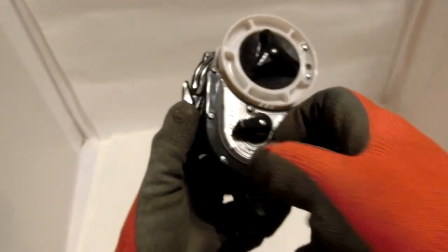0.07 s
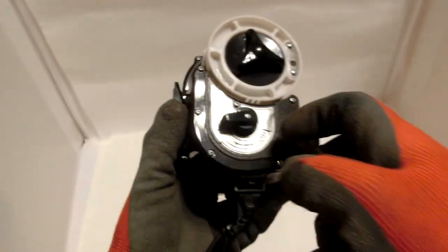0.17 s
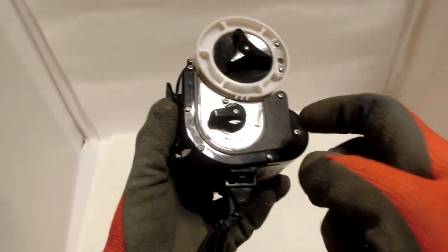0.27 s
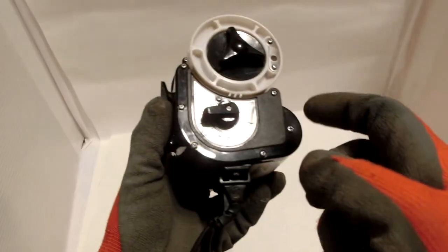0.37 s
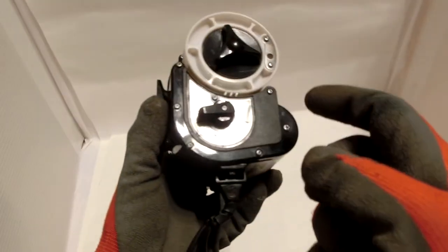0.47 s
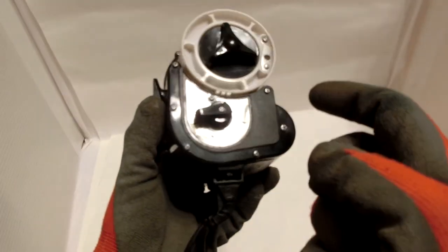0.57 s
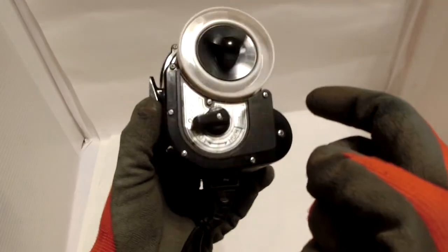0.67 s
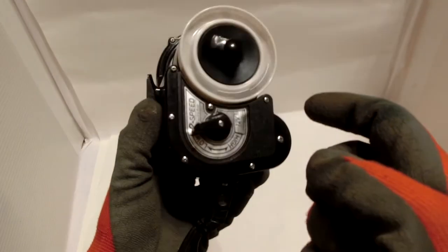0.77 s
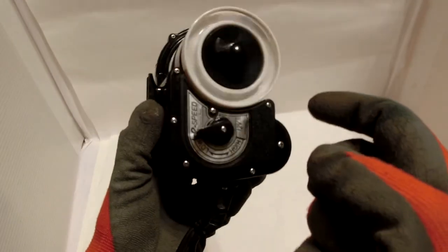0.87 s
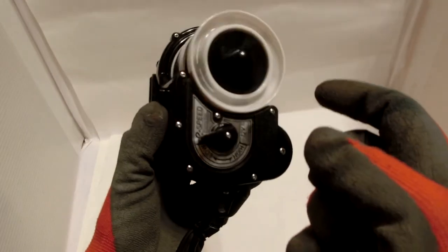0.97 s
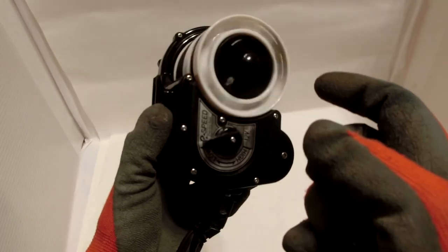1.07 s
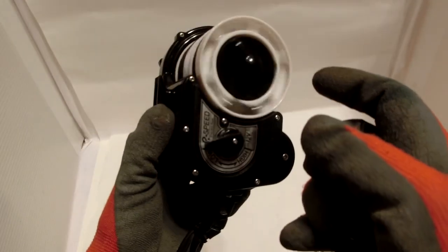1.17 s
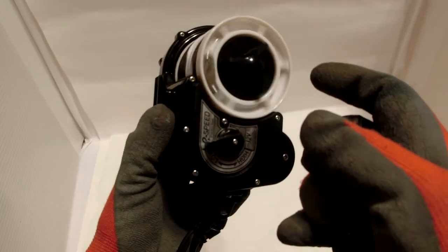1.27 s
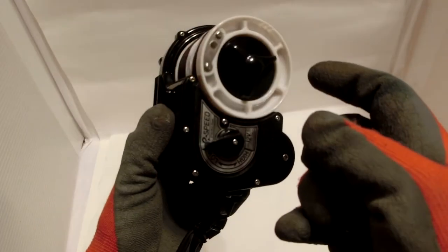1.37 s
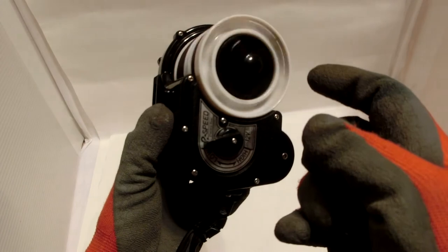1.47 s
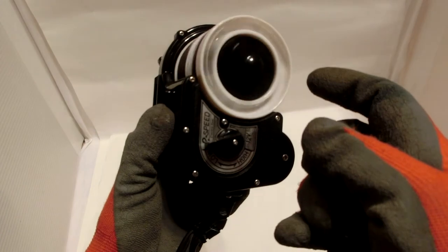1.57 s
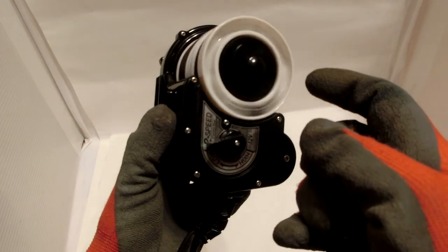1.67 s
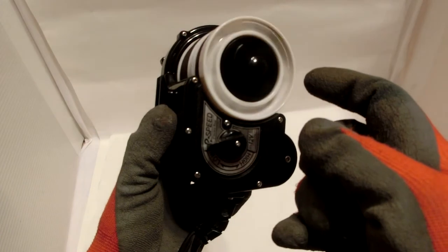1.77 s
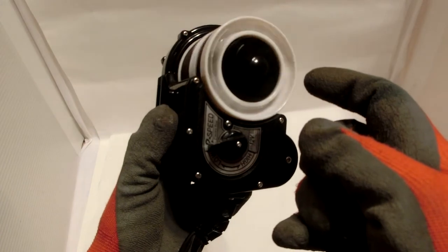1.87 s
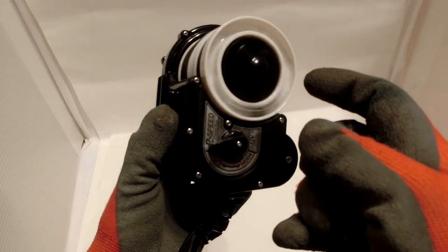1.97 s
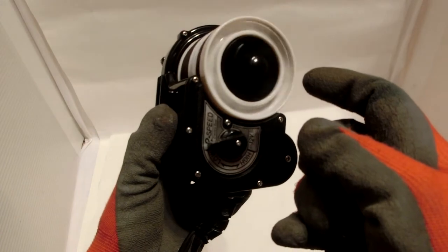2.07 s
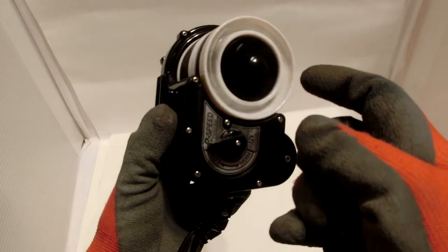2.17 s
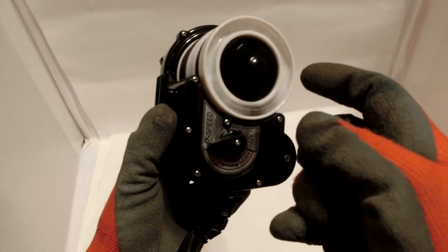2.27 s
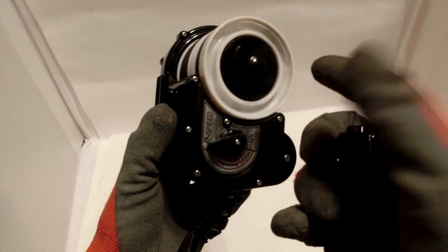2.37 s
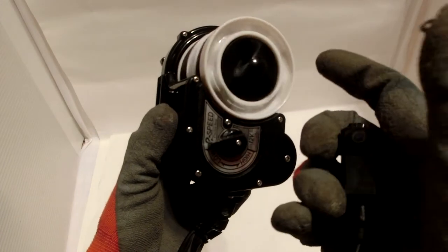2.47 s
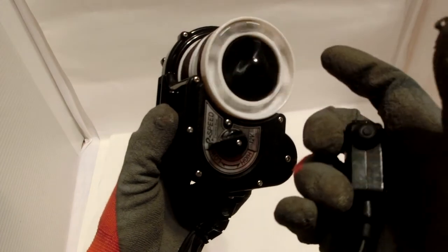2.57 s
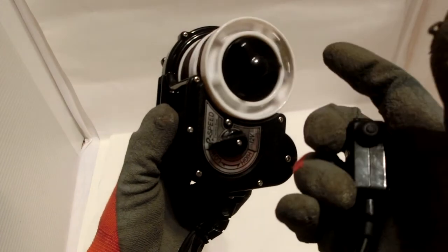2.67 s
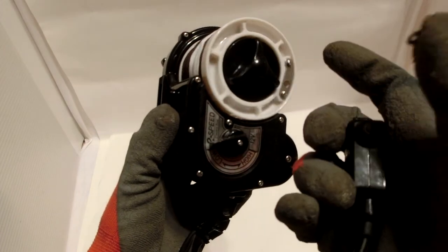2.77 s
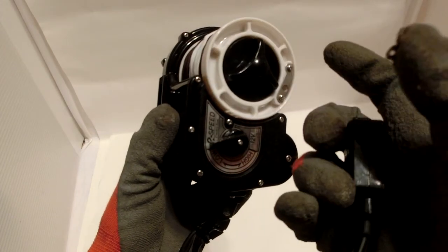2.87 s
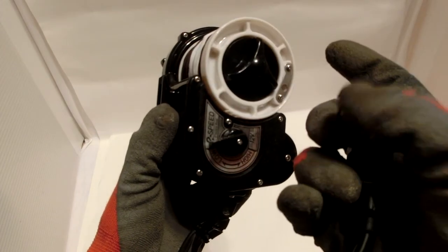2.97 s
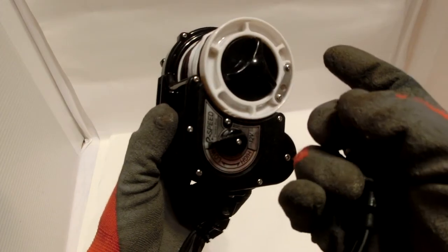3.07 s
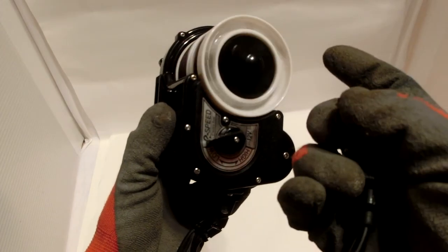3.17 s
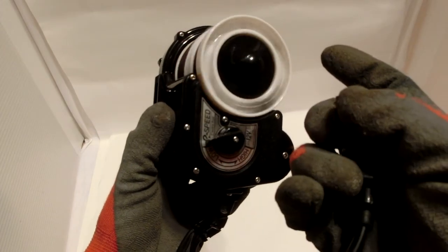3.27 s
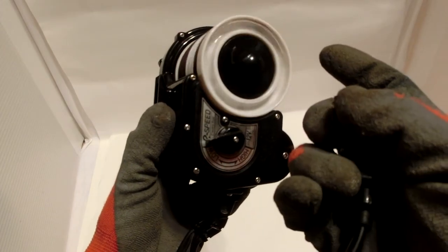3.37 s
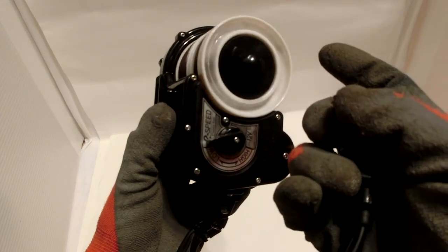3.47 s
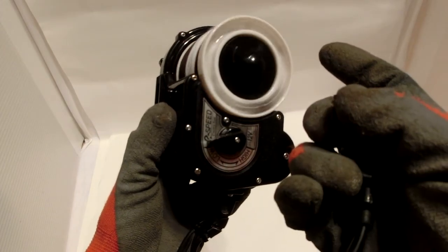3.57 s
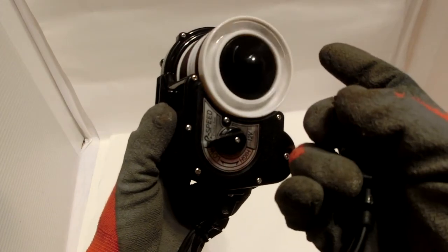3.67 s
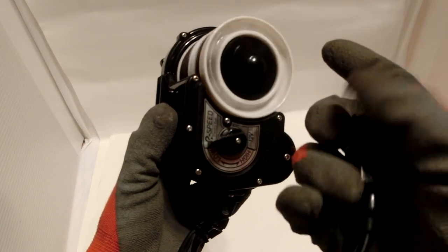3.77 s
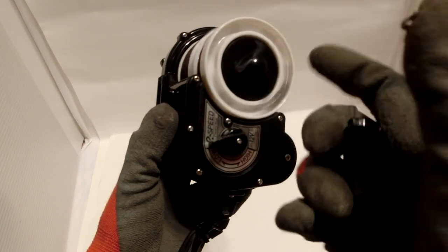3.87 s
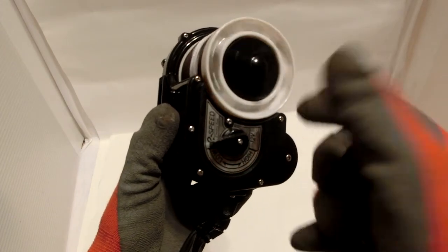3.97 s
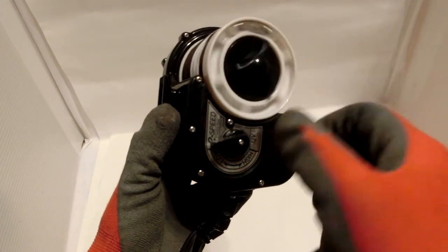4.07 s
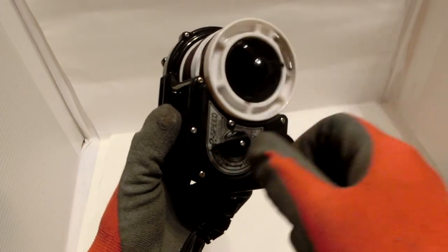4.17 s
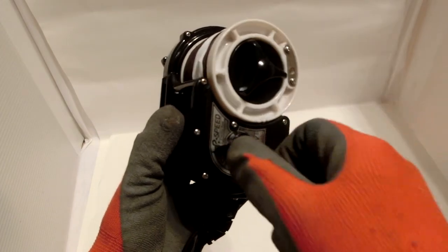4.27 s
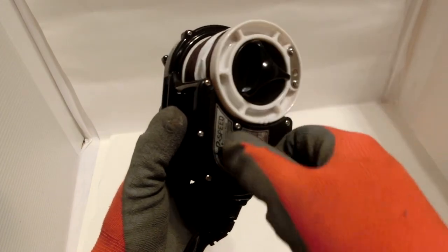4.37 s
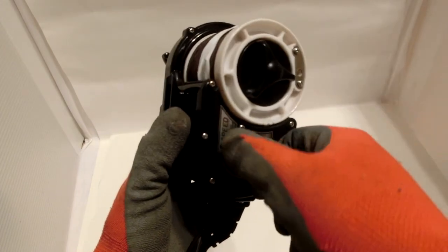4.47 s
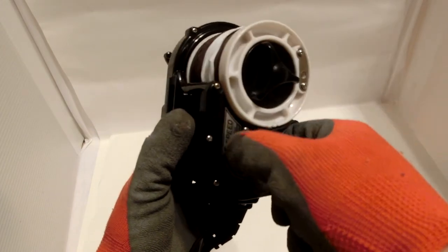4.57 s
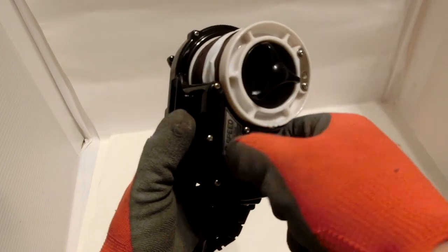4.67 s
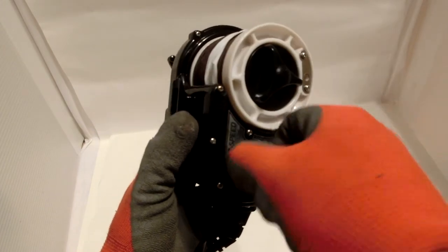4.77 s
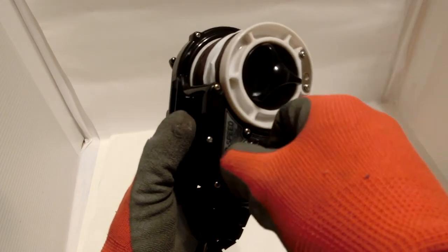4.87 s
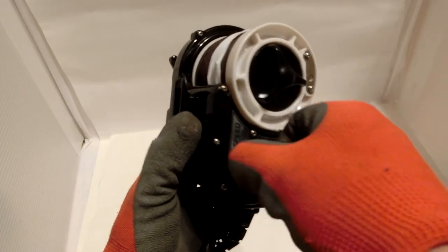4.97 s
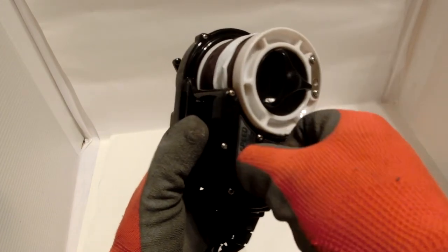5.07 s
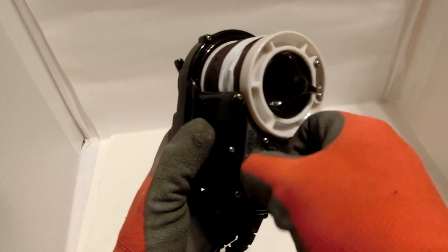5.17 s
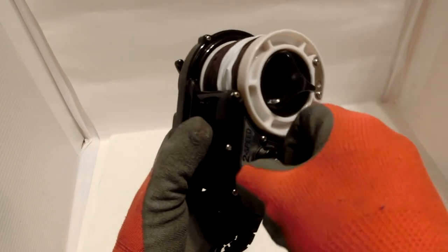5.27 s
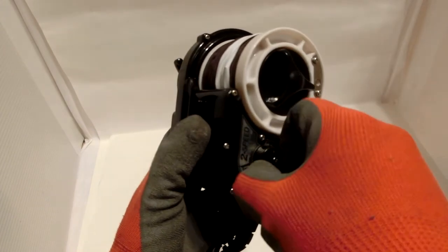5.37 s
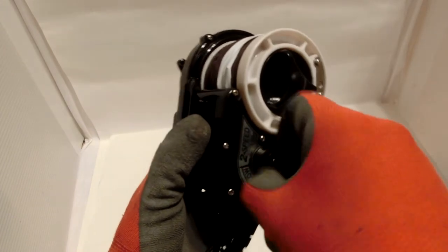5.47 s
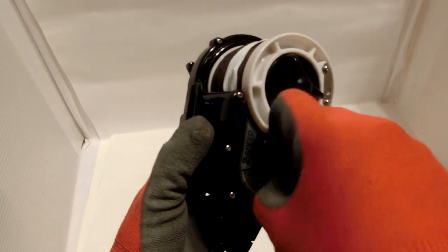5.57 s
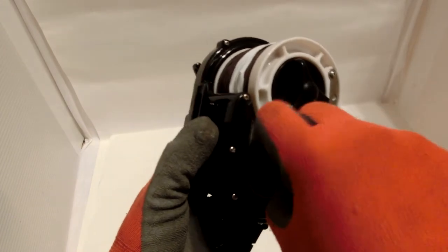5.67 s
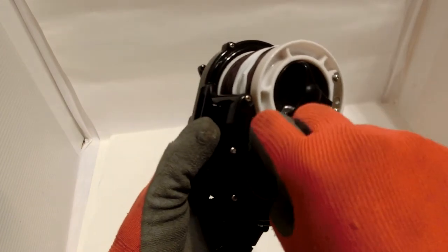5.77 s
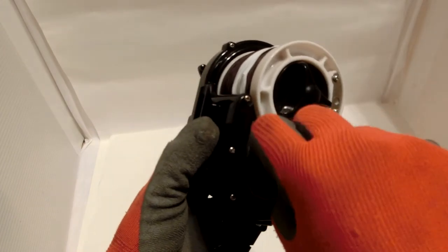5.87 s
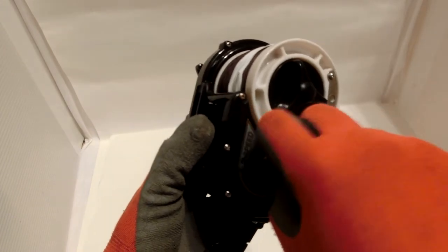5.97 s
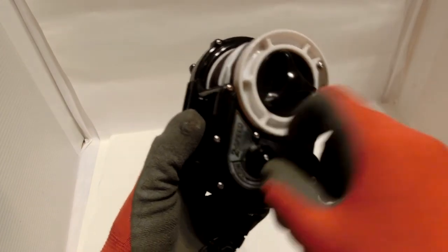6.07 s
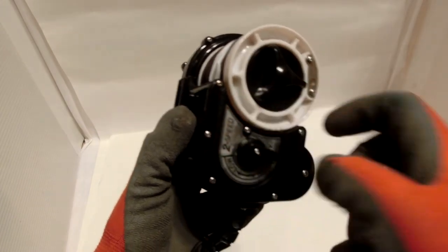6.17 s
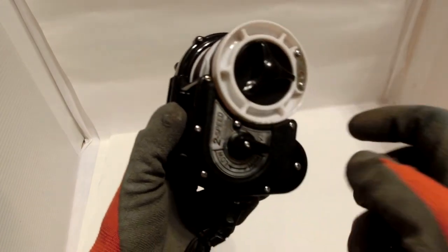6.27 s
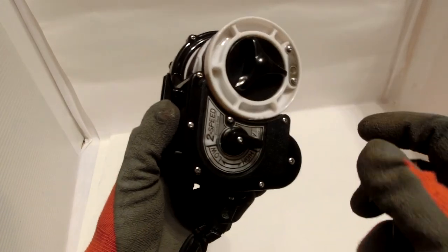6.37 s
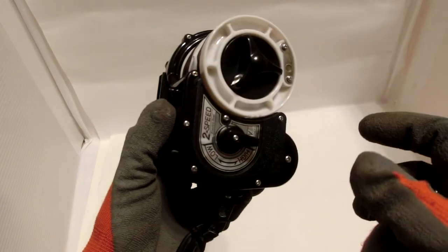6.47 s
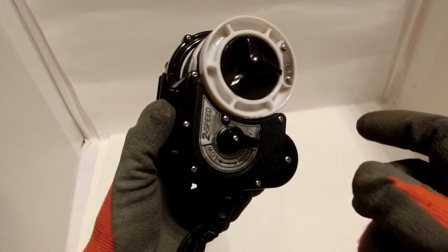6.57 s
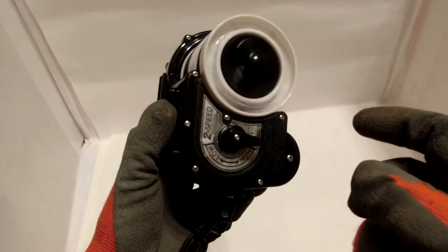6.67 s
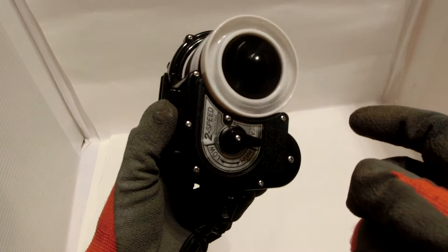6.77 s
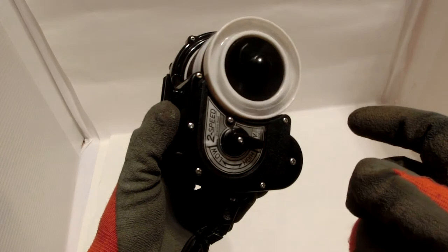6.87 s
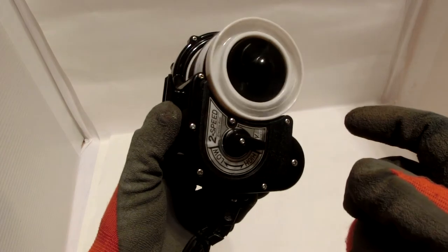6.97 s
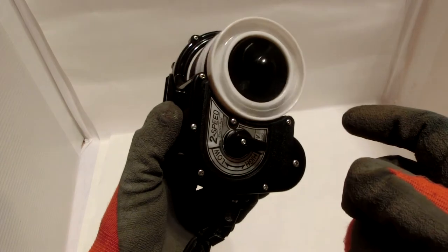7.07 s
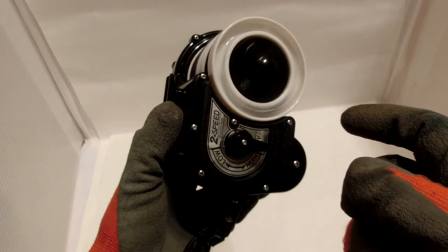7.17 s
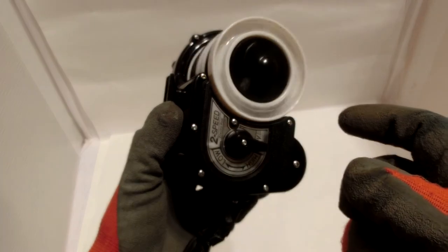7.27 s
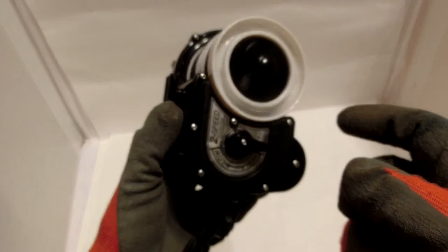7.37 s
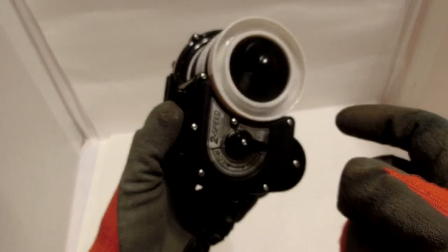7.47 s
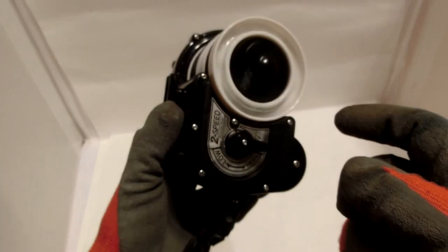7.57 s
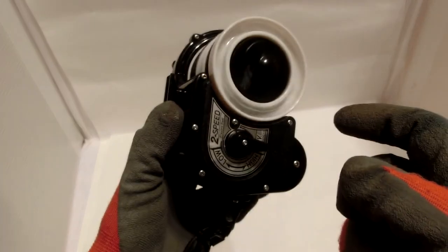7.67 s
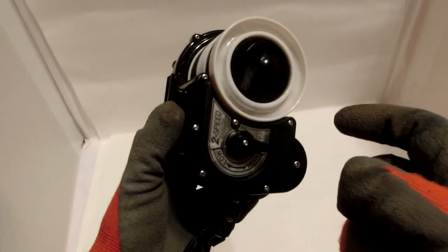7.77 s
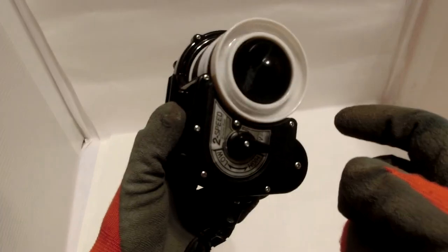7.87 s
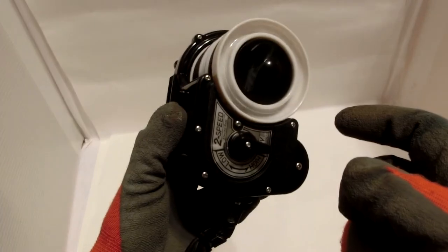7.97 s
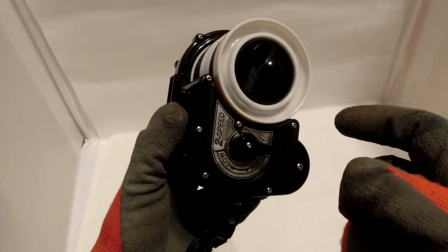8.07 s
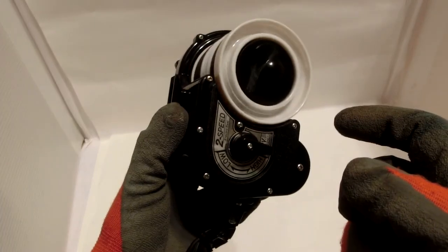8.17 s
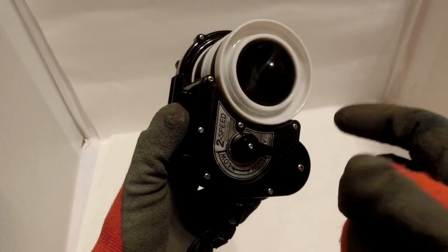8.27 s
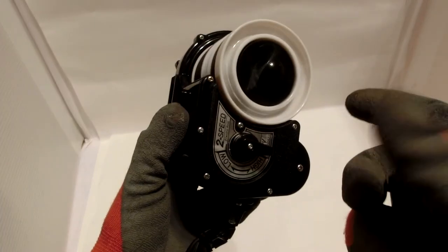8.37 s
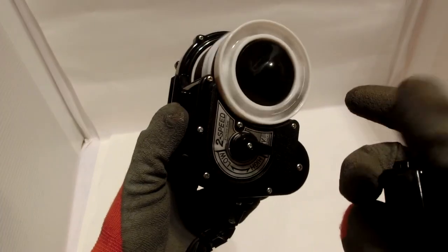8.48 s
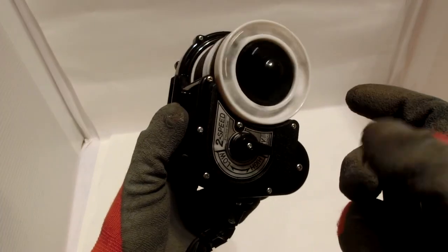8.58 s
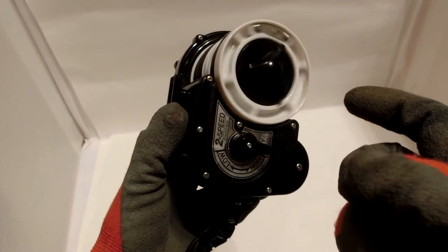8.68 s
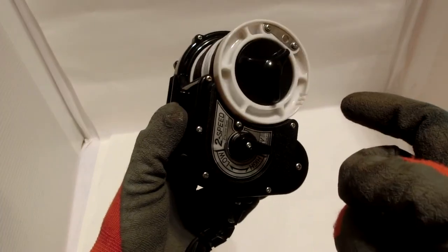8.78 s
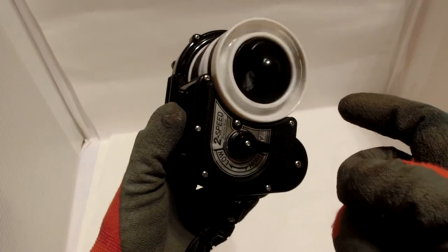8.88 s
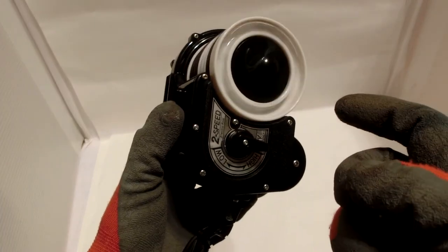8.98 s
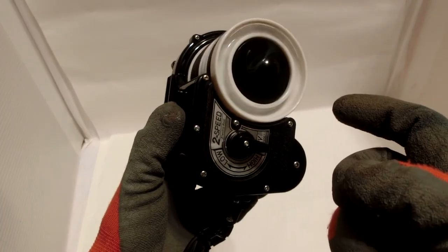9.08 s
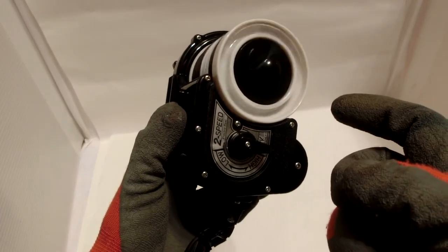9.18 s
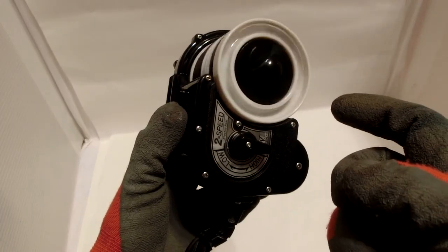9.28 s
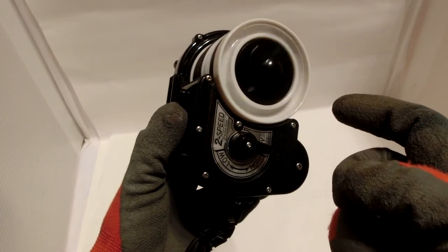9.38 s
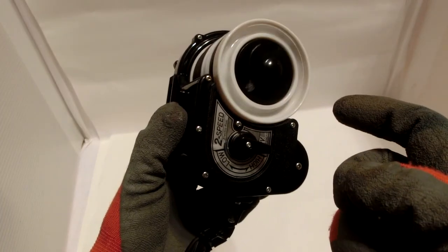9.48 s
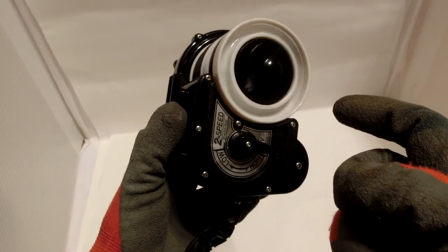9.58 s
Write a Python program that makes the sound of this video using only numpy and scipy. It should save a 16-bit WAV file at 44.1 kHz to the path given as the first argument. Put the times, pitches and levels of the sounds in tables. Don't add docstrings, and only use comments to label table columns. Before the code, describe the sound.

Very close, nearly centred, in a small hard box with a short bright flutter; quiet low room air beneath. At about 0.5 s a faint switch tick and brief groan start a motor: crisp metallic clicks, roughly fifty a second, with a hollow knock every eighth click, gritty growl, hiss and a thin whine near 1.7 kHz. Power stops at 0.9 s; the whine drops away and clicks slow. A longer run goes from 1.35 to 2.3 s, another from 3.05 to 3.7 s, each coasting into sparse ticks; one late click at 4.2 s. Faint glove rubs, creaks and taps follow, then a hard lever snap at 5.6 s. At 6.6 s a faster gear starts, about eighty clicks a second with a stronger steady whine, until 8.3 s, then slows. A soft low air puff at 8.75 s precedes the last fast run from 8.8 s, continuing to nearly the end.

```python
import sys
import numpy as np
from scipy import signal
from scipy.fft import rfft, irfft
from scipy.io import wavfile
from scipy.ndimage import uniform_filter1d

SR = 44100
rng = np.random.default_rng(int(sys.argv[2]) if len(sys.argv) > 2 else 0)


def output_pcm(signal):
    pcm = np.clip(np.atleast_2d(signal).T, -1, 1) * 32767
    wavfile.write(sys.argv[1], SR, np.round(pcm).astype(np.int16))


def gain_from_db(level_db):
    decades = np.asarray(level_db, float) / 20
    return 10 ** decades


N = 424679


def rms_one(x):
    return x / np.sqrt(np.mean(x ** 2) + 1e-20)


def in_time(tables, column, rest=-120):
    t, out = np.arange(N) / SR, np.full(N, float(rest))
    for rows in map(np.array, tables):
        inside = (t >= rows[0, 0]) & (t <= rows[-1, 0])
        out[inside] = np.interp(t[inside], rows[:, 0], rows[:, column])
    return out


def marks(times_s, levels_db):
    out = np.zeros(N)
    np.add.at(out, np.round(np.array(times_s) * SR).astype(int), gain_from_db(np.array(levels_db)))
    return out


def swells(rows):
    t = np.arange(N) / SR
    total = 0
    for peak_s, level_db, rise, fall in rows:
        drop_db = np.where(t < peak_s, rise * (peak_s - t), fall * (t - peak_s))
        total = total + gain_from_db(level_db - drop_db)
    return total


def drift(rate_hz):
    r = np.exp(-2 * np.pi * rate_hz / SR)
    return rms_one(signal.lfilter([1], [1, -2 * r, r * r], rng.standard_normal(N + SR))[SR:])


def resonate(x, hz, width_hz):
    r = np.exp(-np.pi * width_hz / SR)
    gain = (1 - r * r) / 2
    return signal.lfilter([gain, 0, -gain], [1, -2 * r * np.cos(2 * np.pi * hz / SR), r * r], x + 1e-18)


def causal(gain):
    fold = irfft(np.log(gain + 1e-9))
    fold[1:len(gain) - 1] *= 2
    fold[len(gain):] = 0
    response = irfft(np.exp(rfft(fold)))
    return response / np.sqrt(np.sum(response ** 2))


def colour(pair, spectrum, side, peaks=()):
    hz = np.maximum(np.arange(4097) * SR / 8192, 1)

    def curve(points):
        point_hz, point_db = np.array(points).T
        return np.interp(np.log(hz), np.log(point_hz), point_db)

    mid_db = curve(spectrum)
    for top_hz, width_hz, lift_db in peaks:
        mid_db = mid_db + lift_db / (1 + (2 * (hz - top_hz) / width_hz) ** 2)
    side_db = mid_db + curve(side)
    side_share = np.sqrt(np.sum(gain_from_db(side_db) ** 2) / np.sum(gain_from_db(mid_db) ** 2))
    across = .25 * np.roll(pair[0], 2) + .95 * pair[1]
    mid = signal.oaconvolve(pair[0], causal(gain_from_db(mid_db)))[:N]
    wide = side_share * signal.oaconvolve(across, causal(gain_from_db(side_db)))[:N]
    return np.array([mid + wide, mid - wide])


def bursts(clicks, hold_s, fall_s, grit_db, impact):
    t = np.arange(2000) / SR
    shape = np.minimum(t / .0004, 1) * np.exp(-t / .014 - np.maximum(t - hold_s, 0) / fall_s)
    grit = rms_one(rng.standard_normal((2, N)) * gain_from_db(grit_db * rng.exponential(1, N)))
    return signal.oaconvolve(clicks, shape)[:N] * grit + impact * clicks * [[1], [0]]


# time [s], level [dB]
AIR_S_DB = [(0, -56.5), (2.9, -61), (4.2, -60), (5.55, -57), (5.7, -65), (6.55, -61.5), (8.7, -59),
            (9.63, -61.5)]
# frequency [Hz], density [dB per Hz]
AIR_SPECTRUM = [(12, -28.5), (20, 1.5), (63, -1), (202, -11), (282, -6.5), (324, -2), (565, -10.5),
                (686, -11.5), (857, -5), (1100, -18.5), (6540, -28), (11100, -28), (14300, -39.5),
                (15500, -31.5)]
# frequency [Hz], side minus mid [dB]
ROOM_SIDE = [(60, -3), (110, -7.5), (200, 1.5), (380, -13), (700, -14.5), (1290, -5), (2380, -7),
             (4400, -2.5), (8120, -2), (15000, 5)]


def room():
    level = gain_from_db(in_time([AIR_S_DB], column=1, rest=-57))
    return colour(rng.standard_normal((2, N)) * level, AIR_SPECTRUM, ROOM_SIDE)


# delay [s], level [dB]
ECHOES = [(.0106, -19), (.0119, -19), (.0235, -23)]


def box(x):
    tail_db, t60_s = -9.5, .2
    t = np.arange(SR // 3) / SR
    onset = np.clip((t - .002) / 0.0017, 0, 1)
    tail = rng.standard_normal((2, len(t))) * gain_from_db(-60 * t / t60_s) * onset
    tail *= gain_from_db(tail_db) / np.sqrt(np.sum(tail ** 2, axis=1, keepdims=True))
    for delay_s, level_db in ECHOES:
        tail[:, round(delay_s * SR)] += gain_from_db(level_db)
    thin = signal.sosfilt(signal.butter(2, 1100, "high", fs=SR, output="sos"), x)
    return signal.oaconvolve(thin, tail, axes=1)[:, :N]


# peak_s [s], level_db [dB], rise [dB/s], fall [dB/s]
RUBS = [(4.498, -63.5, 900, 700), (4.612, -67, 250, 76.5), (4.74, -69, 500, 500), (5.082, -69, 180, 75),
        (5.448, -38.5, 603, 1300), (5.464, -61.5, 900.5, 132), (5.6, -68, 88, 898.5), (5.932, -70, 164, 58),
        (6.304, -67, 220, 600)]
# peak_s [s], level_db [dB], rise [dB/s], fall [dB/s]
PUFFS = [
    (8.752, -42, 351.5, 440),
    (8.684, -58, 204, 300),
]


def hands():
    fabric_hz_db = [(900, -5.0), (2200, -4.5), (3500, -1.0), (7000, -1.5), (14000, -5.5), (17000, -29.0)]
    rub = colour(rng.standard_normal((2, N)) * swells(RUBS), fabric_hz_db, ROOM_SIDE)
    band = signal.butter(2, [30, 90], "band", fs=SR, output="sos")
    air = rms_one(signal.sosfilt(band, rng.standard_normal(N)))
    return rub + air * swells(PUFFS)


# middle_s [s], length_s [s], pitch_hz [Hz], level_db [dB]
CREAKS = [(4.377, 0.021, 1900, -71), (4.607, 0.029, 3590, -72), (5.908, 0.042, 7700, -75),
          (6.04, 0.045, 2110, -73), (6.287, 0.026, 7300, -74)]
# middle_s [s], length_s [s], pitch_hz [Hz], level_db [dB]
GROANS = [
    (0.506, 0.02, 1570, -28),
    (0.659, 0.0046, 1684, -20),
    (6.6, .008, 1600, -21.5),
]


def creaks():
    t, noise = np.arange(N) / SR, rng.standard_normal(N)
    out = np.zeros(N)
    for middle_s, length_s, pitch_hz, level_db in CREAKS + GROANS:
        narrow = rms_one(resonate(resonate(noise, pitch_hz, 220), pitch_hz, 220))
        out += gain_from_db(level_db) * narrow * np.exp(-((t - middle_s) / length_s) ** 2)
    return out


# snap_s [s], level_db [dB]
LEVER = [(5.6157, 5)]
# frequency [Hz], density [dB per Hz]
SNAP_SPECTRUM = [(59, -61.5), (100, -35.5), (547, -19.5), (1580, -4), (2690, -6), (3700, 3.5), (4290, -4),
                 (5420, 1.5), (7140, 0), (8460, -7), (10700, -7), (14400, -24), (16000, -30.5)]
# frequency [Hz], side minus mid [dB]
NEAR_SIDE = [(60, 6.5), (110, -3.5), (200, -6), (380, -6.5), (700, -8), (1290, -48), (2380, -29),
             (4400, -17), (8120, -5), (15000, 1)]


def lever():
    snap_s, level_db = LEVER[0]
    snap = bursts(marks([snap_s], [level_db - 12]), hold_s=0.00063, fall_s=0.0032, grit_db=0.9, impact=7.0)
    return colour(snap, SNAP_SPECTRUM, NEAR_SIDE)


def gear():
    return (np.arange(N) / SR > LEVER[0][0]).astype(int)


# on_s [s], tick_db [dB], start-up growl_db [dB], whine_db under full load [dB]
SWITCH = [
    (0.4644, -34, -1.5, -27),
    (1.336, -40, -3.5, 3),
    (3.017, -34.5, 0, -2.5),
    (6.552, -37, 2, -12),
    (8.792, -35.5, 0, 12),
]
# first_tooth_s [s], off_s [s], top speed [teeth/s], share of top at first tooth [1],
# dry friction [teeth/s2]
BURSTS = [
    (.5062, .876, 51.836, .6979, 67.434),
    (1.3595, 2.2806, 52.947, .4414, 65.446),
    (3.0461, 3.7268, 53.18, .4887, 67.25),
    (6.5921, 8.2808, 80.076, .6046, 162.66),
    (8.8127, 9.8, 81.185, .3711, 162.66),
]
# spin_up_s [s], creep of speed [1/s], coasting drag_s [s], knocking tooth of the turn [index]
GEARS = [
    (.0439, .0139, .6113, 6),
    (.0492, .0122, 1.0748, 7),
]


def spool():
    late_drop_s = 4.2372
    t, speed, share, coasting_s, teeth_s = np.arange(N) / SR, np.zeros(N), np.zeros(N), np.ones(N), []
    ends_s = [s for s, *_ in SWITCH[1:]] + [N / SR]
    for (first_s, off_s, top, start, friction), (on_s, *_), end_s in zip(BURSTS, SWITCH, ends_s):
        rise_s, creep, drag_s, _ = GEARS[int(first_s > LEVER[0][0])]
        now = (t >= on_s) & (t < end_s)
        driven_s = np.minimum(t[now], off_s) - first_s
        coasting_s[now] = np.maximum(t[now] - off_s, 0)
        reached = top * (1 - (1 - start) * np.exp(-driven_s / rise_s) + creep * driven_s)
        loss = friction * drag_s
        speed[now] = np.maximum((reached + loss) * np.exp(-coasting_s[now] / drag_s) - loss, 0)
        share[now] = speed[now] / top
        passed = np.cumsum(speed[now] * (t[now] >= first_s)) / SR
        teeth_s += [first_s] + list(t[now][1:][np.diff(np.floor(passed)) > 0])
    return speed, share, coasting_s, np.sort(teeth_s + [late_drop_s])


# start_s [s], peak_db [dB], centre_hz [Hz], length_s [s], edge_db [dB]
TICKS = [
    (0.5447, -9, 3780, 0.0031, -1),
    (5.016, -54.5, 2550, 0.0043, -25.5),
    (5.059, -47, 2540, 0.0031, -32),
    (5.078, -37, 2400, 0.00087, -5),
    (5.161, -53, 2590, 0.006, -19.5),
    (5.307, -60, 2460, 0.0065, -31),
    (5.403, -39.5, 2800, 0.0017, -24),
    (5.443, -23.5, 4120, 0.00075, -8.5),
    (6.589, -18.5, 3300, 0.0043, -4),
]


def ticks():
    out, t = np.zeros((2, N)), np.arange(1500) / SR
    switch_ticks = [(on_s, tick_db, 6500, 0.0028, 5.5) for on_s, tick_db, *_ in SWITCH]
    for start_s, peak_db, centre_hz, length_s, edge_db in TICKS + switch_ticks:
        mid, side = rng.standard_normal((2, len(t))) * np.exp(-t / length_s)
        crackle = np.array([mid + .4 * side, mid - 0.27 * side])
        body = 3 * resonate(crackle, centre_hz, 0.6 * centre_hz)
        edge = gain_from_db(edge_db) * np.diff(crackle, prepend=0)
        out[:, round(start_s * SR):][:, :len(t)] += gain_from_db(peak_db) * (body + edge)
    return out


# growl_db [dB], hiss_db [dB]
RUNNING = [
    (-34.5, -33.5),
    (-33, -32),
]
# frequency [Hz], density [dB per Hz]
GROWL_SPECTRUM = [(18, -50.5), (30, -23), (117, -24.5), (178, -18), (391, -19), (478, -12.5), (607, -36),
                  (844, 0), (1070, -9.5), (1330, -9.5), (1660, 1), (1930, -12.5), (2400, -15.5),
                  (3120, -20.5), (5280, -120)]
# frequency [Hz], density [dB per Hz]
HISS_SPECTRUM = [(1290, -44.5), (2200, 1), (3160, 1), (4580, -2.5), (4980, -5.5), (6540, 1.5), (9710, -4.5),
                 (14400, -7), (15800, -20.5)]
# frequency [Hz], width [Hz], lift [dB]
HOUSING = [(3236, 250, 6), (3962, 470, 8), (4264, 62, 3.5), (4896, 280, 5.5), (5330, 85, 5),
           (8230, 58, -24), (9900, 760, 2.5), (11220, 230, 3), (13900, 180, 2.5)]


def train(share, coasting_s):
    growl_follows, hiss_follows, unpowered_db = 1, 1.4, -1.5
    power_lag_s, start_growl_s = 0.0087, 0.12
    t, (growl_db, hiss_db) = np.arange(N) / SR, np.array(RUNNING)[gear()].T
    starting_db = np.zeros(N)
    for on_s, _, start_db, _ in SWITCH:
        fading_db = start_db * np.exp(-np.abs(t - on_s) / start_growl_s)
        starting_db += np.where(t < on_s + power_lag_s, -60 * (t >= on_s), fading_db)
    power = np.where(coasting_s == 0, 1, gain_from_db(unpowered_db) * share ** growl_follows)
    growl = uniform_filter1d(gain_from_db(growl_db + starting_db) * power, size=200)
    hiss = uniform_filter1d(gain_from_db(hiss_db) * share ** hiss_follows, size=200)
    low = colour(rng.standard_normal((2, N)) * growl * gain_from_db(2.0 * drift(20)), GROWL_SPECTRUM, NEAR_SIDE)
    high = colour(rng.standard_normal((2, N)) * hiss * gain_from_db(1.2 * drift(55)), HISS_SPECTRUM, NEAR_SIDE, HOUSING)
    return low + high


# mesh cycles per ratchet tooth [1], whine_db [dB]
MESH = [
    (31.8, -35.5),
    (20.03, -25.3),
]
# pitch ratio to the whine [1], level re whine [dB]
PARTNERS = [(1.0725, -14), (.95, -18), (.9, -21)]


def whine(speed, share, coasting_s):
    break_db, fade_db_per_s = 7.5, 450
    cycles, steady_db = np.array(MESH)[gear()].T
    pitch_hz = cycles * speed
    phase = 2 * np.pi * np.cumsum(pitch_hz * (1 + 0.0034 * drift(40))) / SR
    radiated_db = -11 * np.exp(-((pitch_hz - 1300) / 190) ** 2) - 6 * (pitch_hz < 1300)
    load = np.clip(1 - share, 0, 1) * (coasting_s == 0)
    loaded_db = in_time([[(s, db), (s + .4, db)] for s, *_, db in SWITCH], column=1, rest=0)
    load_db = load * loaded_db + np.sqrt(load) * break_db * drift(21)
    level = gain_from_db(steady_db + radiated_db + load_db - fade_db_per_s * coasting_s) * (pitch_hz > 800)
    tone = gain_from_db(2.0 * drift(60)) * np.sin(phase)
    extra = sum(gain_from_db(db + 3 * drift(30)) * np.sin(ratio * phase) for ratio, db in PARTNERS)
    return np.sqrt(2) * uniform_filter1d(level, size=400) * (tone + gear() * extra)


TEETH = 8
# start_s [s], level_db [dB]
ENGAGE = [
    (.546, -22.5),
    (4.237, -40.5),
    (6.59, -22.5),
    (8.825, -26),
]
SLOW_KNOCK_DB = [-24, -27.9, -24, -32, -23.5, -27, -21, -22, -22.5, -21, -23.5, -22.5, -26.5, -21, -24.2,
                 -23.5, -24]
# frequency [Hz], width [Hz], level [dB]
SHELL = [(844, 45.4, 6), (1500, 240, -1.5), (937, 67, -15), (192, 290, -12), (338, 930, -15),
         (520, 200, -26.5)]


def knocks(teeth_s):
    knock_db, knock_spread_db = -25.5, 2.5
    fast_thud_db = -3.5
    high = (teeth_s > LEVER[0][0]).astype(int)
    turn = np.arange(len(teeth_s)) % TEETH == np.array(GEARS)[high, 3]
    strength_db = (knock_db + knock_spread_db * rng.standard_normal(len(teeth_s)))[turn]
    strength_db[:len(SLOW_KNOCK_DB)] = SLOW_KNOCK_DB
    s, db = np.concatenate([ENGAGE, np.transpose([teeth_s[turn] - .0005, strength_db])]).T
    luck, out = rng.standard_normal((len(s), len(SHELL))), np.zeros(N)
    for k, (hz, width_hz, mode_db) in enumerate(SHELL):
        chance_db = 2.6 * luck[:, k] * (k > 0)
        thud_db = fast_thud_db * (hz < SHELL[0][0]) * (s > LEVER[0][0])
        hit = marks(s - .001, db + 31.5 + mode_db + chance_db + thud_db)
        blow = 0.25 * hit + np.roll(hit, round(.0012 * SR))
        blow = blow + 2.72 * np.roll(blow, round(0.002384 * SR))
        out += (-1) ** k * resonate(blow, hz, width_hz)
    return out


TOOTH_DB = [-.5, -1.9, 0.31, 0.87, -0.52, -1.1, 0.44, 0.93]
# frequency [Hz], density [dB per Hz]
STRIKE_SPECTRUM = [(88, -50.5), (150, -26), (1520, -16), (2120, -17), (3140, -11), (3660, -13.5),
                   (5410, -4.5), (5960, -8), (7390, -5), (8150, -4.5), (12500, -10.5), (14100, -11.5),
                   (15800, -15.5)]
# frequency [Hz], width [Hz], level [dB]
SPRING = [(4945, 130, 4), (9920, 300, -1), (7700, 220, -3)]


def pawl(teeth_s, share):
    strike_db, first_strike_db, spread_db = -16, 2, 0.28
    slow_strike_db = 2.5
    spring_lift_db, spring_follows = 1.5, .8
    luck = rng.standard_normal((len(teeth_s), 2))
    place = (np.arange(len(teeth_s)) - (teeth_s > LEVER[0][0])) % TEETH
    first = np.isin(teeth_s, np.array(BURSTS)[:, 0])
    slowness = 1 - share[(teeth_s * SR).astype(int)]
    levels_db = strike_db + np.array(TOOTH_DB)[place] + first_strike_db * first
    levels_db = levels_db + slow_strike_db * slowness + spread_db * luck[:, 1]
    clicks = marks(teeth_s + .0001 + .00012 * luck[:, 0], levels_db)
    rattle = bursts(clicks, hold_s=.004, fall_s=.0006, grit_db=1.9, impact=3.0)
    strikes = colour(rattle, STRIKE_SPECTRUM, NEAR_SIDE, HOUSING)
    pluck = clicks * np.where(gear(), gain_from_db(27), gain_from_db(20)) * gain_from_db(1.5 * rng.standard_normal(N))
    pluck = pluck * gain_from_db(spring_lift_db) * share ** spring_follows
    pluck = np.roll(pluck, round(.001 * SR))
    return strikes + sum(gain_from_db(db) * resonate(pluck, hz, width_hz) for hz, width_hz, db in SPRING)


def scene():
    lean_db = 0.02
    speed, share, coasting_s, teeth_s = spool()
    reel = lever() + ticks() + train(share, coasting_s) + whine(speed, share, coasting_s)
    reel = reel + knocks(teeth_s) + pawl(teeth_s, share)
    mix = room() + box(reel) + hands() + creaks() + reel
    return mix * gain_from_db(np.array([[lean_db], [-lean_db]]))


def roll_off(x):
    return signal.sosfilt(signal.butter(12, 16410, fs=SR, output="sos"), x)


def record(dry):
    cut = signal.sosfilt(signal.cheby2(10, 45, 16450, fs=SR, output="sos"), dry)
    mix = np.clip(cut, -1, 1)
    return roll_off(mix)


dry = scene()
out = record(dry)
output_pcm(out)
```